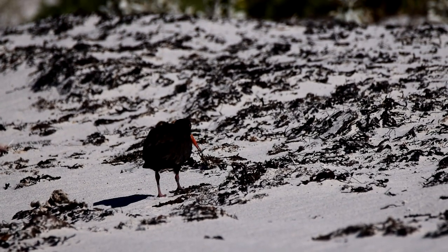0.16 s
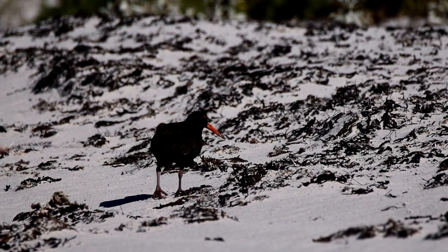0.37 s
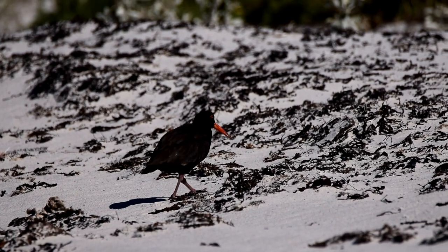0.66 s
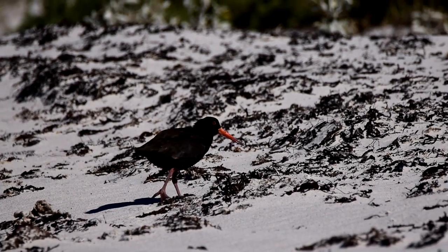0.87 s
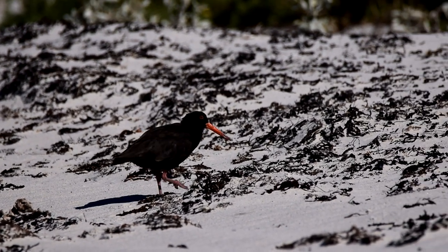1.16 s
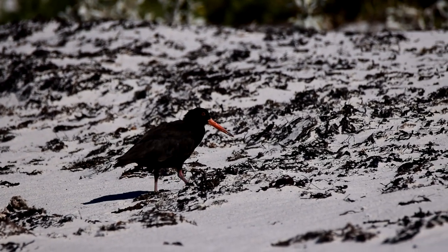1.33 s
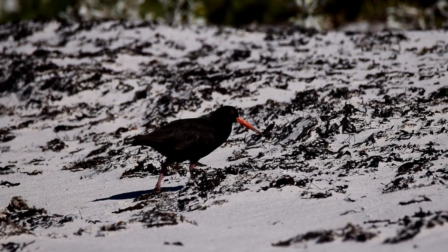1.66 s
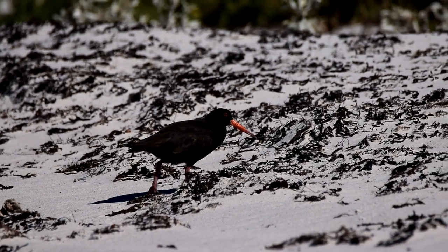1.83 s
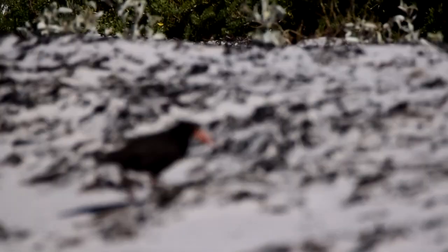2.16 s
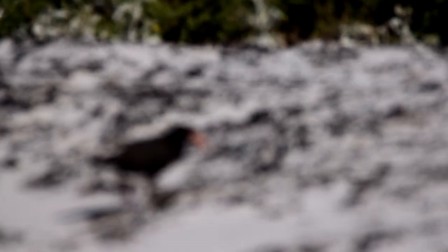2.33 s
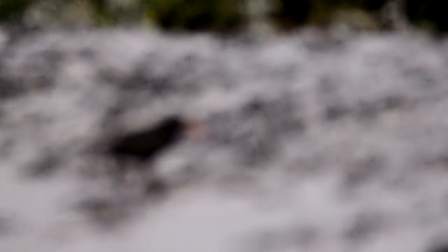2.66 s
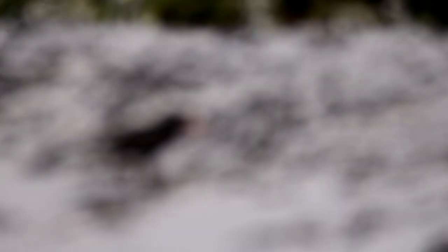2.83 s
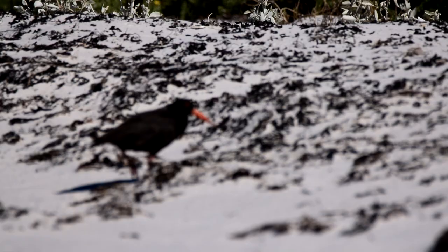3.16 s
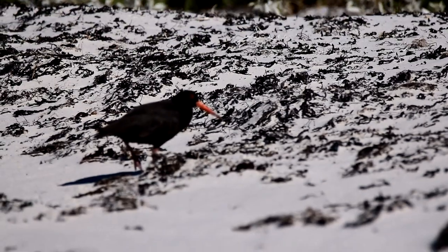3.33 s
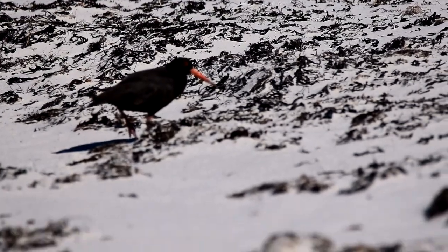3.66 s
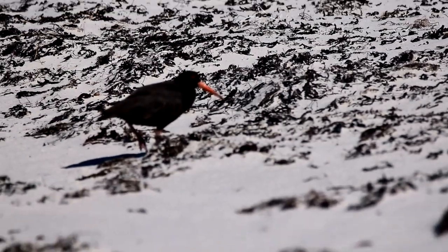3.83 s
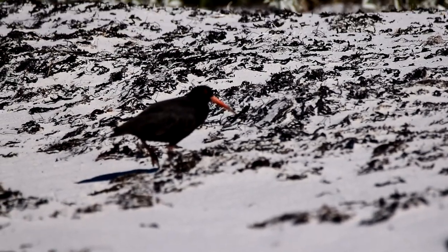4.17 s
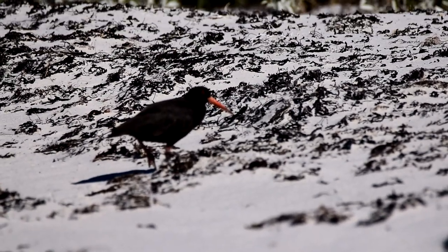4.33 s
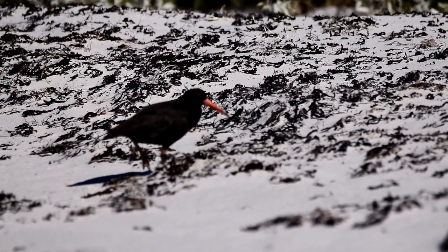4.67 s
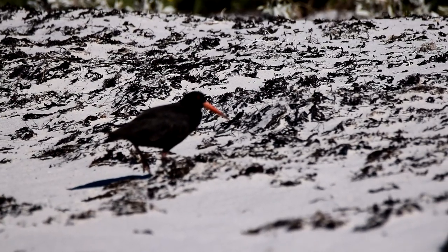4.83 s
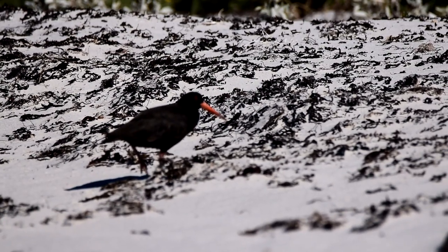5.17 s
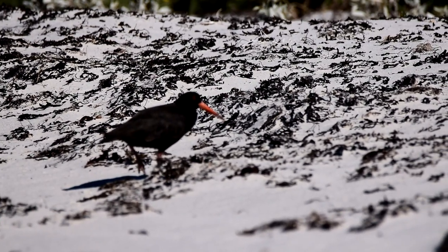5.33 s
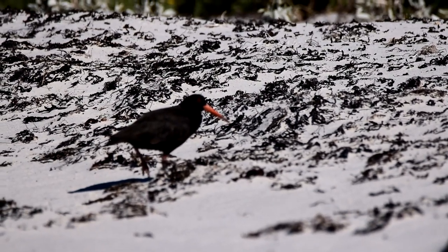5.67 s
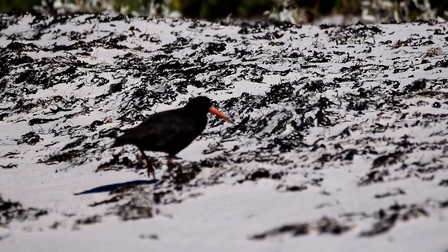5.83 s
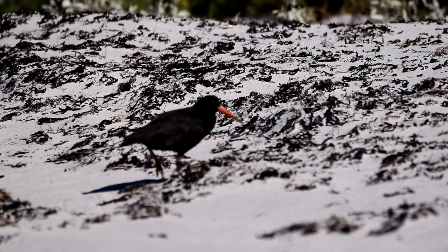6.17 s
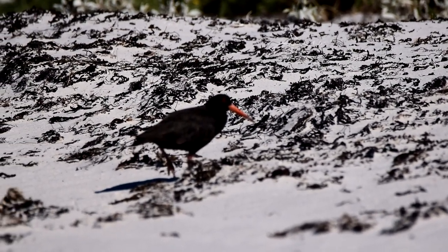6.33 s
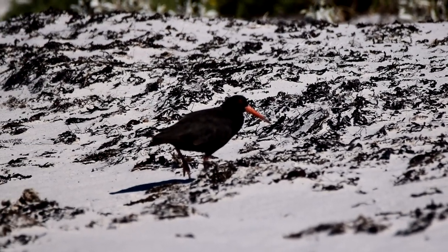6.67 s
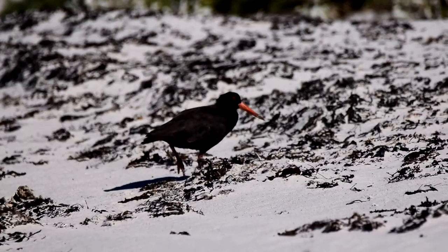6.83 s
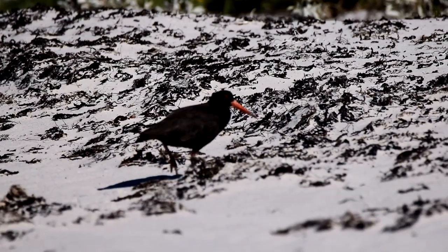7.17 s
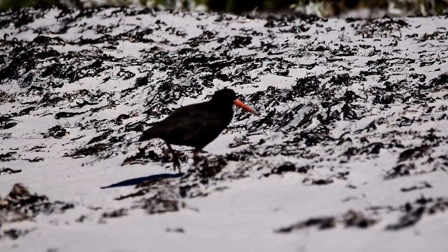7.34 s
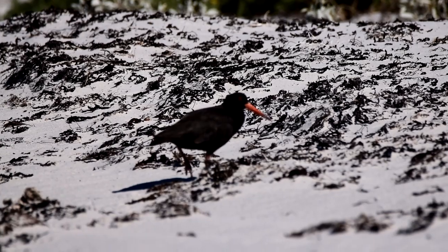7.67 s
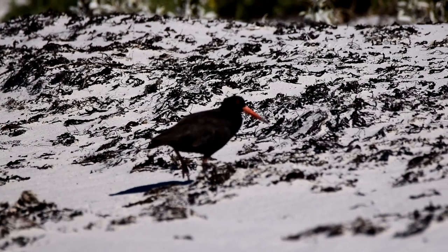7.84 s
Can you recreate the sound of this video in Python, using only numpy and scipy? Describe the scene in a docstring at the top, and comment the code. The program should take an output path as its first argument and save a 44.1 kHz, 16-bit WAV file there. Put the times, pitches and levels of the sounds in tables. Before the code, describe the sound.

Loud, clear bird whistles, each arching up and down with slight rasp, break through constant quiet surf and faint camera focusing whispers.

```python
"""An oystercatcher pipes six notes on an open beach, one of them very soft and on the low side alone.
The other five start and end on the low side of the syrinx and arch over on the high side in the middle;
where both sides sound they beat and rasp. Surf, hissing noise in bands, swells as waves spill and fizz.
A camera's focus drive whispers in narrow hisses and its lens pings once; two dry ticks are bursts of noise.
A breeze adds a very faint low rumble, and a faint low thump follows the loudness of the sound."""
import sys
import numpy as np
from scipy import signal
from scipy.fft import rfft, irfft
from scipy.io import wavfile

SR = 44100
rng = np.random.default_rng(int(sys.argv[2]) if len(sys.argv) > 2 else 0)


def persist_wave(psi):
    """Save psi, clipped to +-1, as 16-bit WAV."""
    counts = np.round(np.clip(psi, -1, 1) * 32767).astype(np.int16)
    wavfile.write(sys.argv[1], SR, np.atleast_2d(counts).T)


N = 352800

# notes, as the low side of the syrinx sings them:
# (start [s], end of the rise [s], start of the fall [s], end [s])
NOTE_TIMES = [(0.073, 0.153, 0.206, 0.329), (1.952, 1.986, 2.124, 2.219), (3.353, 3.397, 3.528, 3.617),
              (4.939, 4.995, 5.014, 5.043), (6.75, 6.767, 6.917, 6.959), (7.139, 7.152, 7.269, 7.328)]
# the low side in each note: (top pitch [Hz], bend of the fall [1 straight, less = late plunge],
# octave [dB], third harmonic [dB], fall of the higher ones [dB per harmonic])
LOW_SIDE_VOICES = [ (2334, 0.44, -31.5, -38, -9), (2330, 0.46, -26, -30.5, -7.5),
                   (2348, 0.48, -30.5, -34, -12.5), (2215, 0.52, -56, -78, -15),
                   (2366, 1.1, -30.5, -35.5, -15), (2285, 0.3, -44, -48.5, -14), ]
# arches of the high side, which takes over between a note's rise and its fall:
# (crest time [s], crest pitch [Hz], pitch where it breaks back [Hz], waver [share of the pitch], tremble [dB],
# lead over the low side [dB], octave [dB], third harmonic [dB], fall of the higher ones [dB per harmonic])
HIGH_SIDE_ARCHES = [ (0.173, 2663, 2474, 0.0027, -1.2, 16, -37.5, -43, -10),
                    (2.038, 2654, 2364, 0.00031, 0.2, 28, -23.5, -33, -7),
                    (3.44, 2652, 2463, 0.00023, 0.6, 39, -34.5, -33.5, -18),
                    (6.835, 2570, 2510, 0.0071, 1.5, 30, -35.5, -44.5, -16),
                    (7.192, 2653, 2405, 0.0068, 2, 24, -46, -49, -17), ]
# loudness of each note, one list a note: (time [s], level [dB])
NOTE_LOUDNESS = [
    [(0.072, -38), (0.082, -26.5), (0.132, -12.5), (0.15, -13.5), (0.242, -12.5), (0.292, -24),
     (0.312, -23), (0.33, -37)],
    [(1.95, -26), (1.956, -27), (1.994, -12), (2.004, -17), (2.068, -19.5), (2.086, -10.5), (2.116, -16.5),
     (2.2, -21.5), (2.221, -33)],
    [(3.351, -36), (3.357, -28), (3.377, -15), (3.441, -12), (3.487, -17.5), (3.509, -10), (3.573, -15),
     (3.62, -34.5)],
    [(4.938, -40), (4.962, -31.5), (5.03, -33), (5.045, -41)],
    [(6.753, -32), (6.763, -22.5), (6.825, -17), (6.837, -28), (6.857, -30), (6.879, -14.5), (6.917, -12),
     (6.953, -28.5), (6.963, -40)],
    [(7.14, -32), (7.146, -22.5), (7.238, -27), (7.27, -20), (7.3, -23.5), (7.328, -33)],
]


def oystercatcher(fade_s=0.003):
    """Six piped notes; one without an arch stays on the low side of the syrinx alone."""
    out = np.zeros(N)
    for times, low, loudness in zip(NOTE_TIMES, LOW_SIDE_VOICES, NOTE_LOUDNESS):
        start, end = times[0], times[-1]
        t = np.arange(start - fade_s, end + fade_s, 1 / SR)
        arch = next((a for a in HIGH_SIDE_ARCHES if start < a[0] < end), None)
        gate = ramp(t, t[0], start) * ramp(t, t[-1], end)
        sides = syrinx(times, low, arch, loudness, t)
        add(out, t[0], gate * note(sides, t))
    return out


ONSET_HZ, END_HZ, RISE_BEND = 1920, 1766, 0.62  # every note scoops up from one pitch and sinks to another
BREAK_UP_S, BREAK_BACK_S = 0.0071, 0.016  # how fast the sides hand over
OVERTONE_ATTACK_S, OVERTONE_RELEASE_S = 0.021, 0.031
OVERTONE_EDGE_DB = -11.5  # overtones are weaker at a note's ends
EDGE_FALL_DB = -3.5  # and the highest go first, per harmonic
WAVER_PER_S, TREMBLE_PER_S = 26, 77  # pace of the high side's unsteadiness in pitch and in level


def syrinx(times, low, arch, loudness, t):
    """Each side through one note: (pitch [Hz], level [dB], octave and third re note [dB], fall [dB/harmonic])."""
    start, risen, falls, end = times
    top_hz, bend, *low_timbre = low
    db, = curves(loudness, t)
    breath = ramp(t, start, start + OVERTONE_ATTACK_S) * ramp(t, end, end - OVERTONE_RELEASE_S)
    slack = 1 - breath

    def timbre(octave_db, third_db, fall_db):
        """Overtones hold their level through the note and dull where the breath is slack."""
        dull_db = OVERTONE_EDGE_DB * slack - db
        return octave_db + dull_db, third_db + dull_db, fall_db + EDGE_FALL_DB * slack

    rise = ramp(t, start, risen) ** RISE_BEND
    fall = ramp(t, end, falls) ** bend
    low_hz = top_hz + (ONSET_HZ - top_hz) * (1 - rise) + (END_HZ - top_hz) * (1 - fall)
    if arch is None:
        return [(low_hz, db, *timbre(*low_timbre))]

    crest, crest_hz, exit_hz, waver, tremble_db, lead_db, *high_timbre = arch
    arch_hz = crest_hz + (exit_hz - crest_hz) * ((t - crest) / (falls - crest)) ** 2
    high_hz = np.maximum(arch_hz, top_hz) * (1 + waver * walk(WAVER_PER_S, len(t)))
    # the high side seizes the air at the top of the rise and gives it back at the fall
    inside = np.minimum((t - risen) / BREAK_UP_S, (falls - t) / BREAK_BACK_S)
    inside = np.maximum(inside, -2)
    ahead_db = lead_db * (1 - np.exp(-inside))
    # both sides together keep the power of the loudness curve, before the tremble
    low_db = db - 10 * np.log10(1 + undb(ahead_db) ** 2)
    high_db = low_db + ahead_db + tremble_db * walk(TREMBLE_PER_S, len(t))
    return [(low_hz, low_db, *timbre(*low_timbre)), (high_hz, high_db, *timbre(*high_timbre))]


NOTCH_HZ, NOTCH_WIDTH_HZ, NOTCH_DB = 4964, 172, -14  # a notch of the windpipe that the octave sweeps through
# colour that windpipe and bill give the overtones above the octave: (frequency [Hz], gain [dB])
THROAT_COLOUR = [(6000, -5.5), (7000, -8.5), (8000, -10), (9200, 1), (10500, 0), (11500, 4.5), (12400, -6),
                 (13200, 1.5), (14000, -2.5), (15500, 0)]


def note(sides, t, drive=1.0, coupling=0.89, overtone_flutter_db=2.0, rasp_db=-31, air_db=-45, break_air_db=-35):
    """The sides share one airstream: they beat, saturate together and make one series of overtones."""
    swings = np.array([membrane(hz, db) for hz, db, *_ in sides])
    # a side that falls well behind the other is starved of air and stops
    strength = abs(swings) / (abs(swings).max(0) + 1e-9)
    swings = swings * np.minimum(strength / .33, 1) ** 2
    power = abs(swings) ** 2 + 1e-14
    effort = np.sqrt(power.sum(0))
    share = power / power.sum(0)

    # the high side mirrors the low one to a combination tone above itself
    mirrored = sum(high ** 2 * swings[0].conj() for high in swings[1:]) / effort ** 2
    flow = swings.sum(0) + 1j * coupling * mirrored
    saturated = np.tanh(drive * abs(flow) / effort) / np.tanh(drive)
    tone = saturated * np.sin(np.angle(flow))

    # the stronger side closes the valve, so it sets the phase and timbre of the overtones
    hz, _, octave_db, third_db, fall_db = sum(part * np.array(side) for part, side in zip(share, sides))
    valve = (np.sqrt(share) * swings).sum(0) / effort
    octave_gain = undb(octave_db + NOTCH_DB * bell(2 * hz, NOTCH_HZ, NOTCH_WIDTH_HZ))
    overtones = octave_gain * np.sin(2 * np.angle(valve))
    for step, k in enumerate(range(3, 9)):
        harmonic_db = third_db + fall_db * step + overtone_flutter_db * walk(88, len(t))
        gain = undb(harmonic_db) * colour(THROAT_COLOUR, k * hz)
        overtones = overtones + gain * np.sin(k * np.angle(valve))

    # turbulence roughens the tone and leaves a thin hiss, most where both sides are equally strong
    clash = 2 * (1 - (share ** 2).sum(0))
    rasp = undb(rasp_db) * walk(1200, len(t))
    hiss = noise(lambda f: bell(f, 5700, 3200), len(t))
    air = (undb(air_db) + undb(break_air_db) * clash) * hiss
    return effort * ((tone + abs(valve) * overtones) * (1 + rasp) + air)


def membrane(hz, db, flutter_db=1.37, jitter=.0025):
    """One side of the syrinx as a rotating phasor with a slightly unsteady pitch and level."""
    unsteady_hz = hz * (1 + jitter * walk(170, len(hz)))
    phase = 2 * np.pi * np.cumsum(unsteady_hz) / SR + rng.uniform(0, 2 * np.pi)
    swing = np.sqrt(2) * undb(db + flutter_db * walk(91, len(hz)))
    return swing * np.exp(1j * phase)


def beach(x, scatter_db=-29, t60_s=.2):
    """Sand, weed and scrub scatter a weak, short tail: decaying noise convolved with the call."""
    t = np.arange(SR // 2) / SR
    tail = noise(lambda hz: bell(hz, 2000, 2500), len(t)) * np.exp(-np.log(1000) * t / t60_s)
    return x + undb(scatter_db) * signal.fftconvolve(x, tail / np.linalg.norm(tail))[:N]


SURF_DB = -37.5  # rms level of the whole surf
# swell of the surf, of which only the swing about each column's mean is heard:
# (time [s], roar of the breakers [dB], wash [dB], foam fizz [dB])
WAVE_SWELLS = [(0.0, -55.5, -33, -55), (0.4, -56, -37, -55.5), (0.7, -58.0, -41.5, -55.0),
               (1.0, -58, -39.5, -57.5), (1.3, -56.0, -41, -58), (1.85, -56.0, -37.5, -55.5),
               (2.3, -61.5, -38.5, -57.5), (2.8, -62, -41, -59), (3.3, -62.5, -38.5, -55),
               (3.75, -60, -40.0, -55), (4.1, -61.5, -40, -56.5), (4.8, -60.5, -43.5, -59.0),
               (5.7, -62, -43, -58.5), (6.35, -60, -42.5, -57), (6.65, -58, -40, -57),
               (7.05, -58, -40, -56.0), (7.5, -57, -40.5, -57.5), (8.0, -57.5, -38, -56.5)]
# relative spectrum of the surf: (frequency [Hz], density [dB per Hz])
SURF_SPECTRUM = [(120, -39), (200, -29), (227, -29), (315, -15.5), (715, -16), (1170, -4), (1740, 1.5),
                 (1950, 0), (2130, 0.5), (3120, -2.5), (4660, -17), (10600, -37), (15500, -36)]


def surf(flicker_db=1.6, churn_db=0.39, spray_follow=0.26):
    """Half-octave bands follow roar, wash and fizz; each flickers a little as the water churns."""
    roar, wash, fizz = (c - np.mean(c) for c in curves(WAVE_SWELLS, np.arange(N) / SR))
    swells = np.array([roar, wash, fizz, spray_follow * fizz])
    swell_hz = [650, 1700, 5000, 12000]
    hz = np.fft.rfftfreq(N, 1 / SR)
    water = rfft(rng.standard_normal(N)) * colour(SURF_SPECTRUM, hz)
    band_of = np.floor(2 * np.log2(np.maximum(hz, 200) / 200))
    churn = churn_db * walk(9, N)  # common to all bands
    out = 0
    for band in range(13):
        inside = band_of == band
        band_hz = hz[inside].mean()
        # each band blends the two swells nearest to it in pitch
        shares = [np.interp(np.log(band_hz), np.log(swell_hz), row) for row in np.eye(len(swells))]
        motion_db = shares @ swells + churn + flicker_db * walk(10.2, N)
        out = out + irfft(water * inside, N) * undb(motion_db)
    return level(out, SURF_DB)


# moves of the camera's focus drive: (start [s], length [s], centre [Hz], width [Hz], level [dB])
FOCUS_DRIVE_MOVES = [(2.098, 0.527, 3152, 574, -39.5), (2.601, 0.36, 3400, 350, -46.5),
                     (3.078, 0.51, 3330, 554, -45), (4.721, 1.3, 2950, 300, -46)]


def focus_drive(waver_db=2.0, ramp_s=0.037):
    """The focus drive rubs softly: a narrow hiss for each move."""
    out = np.zeros(N)
    for start, length, centre_hz, width_hz, db in FOCUS_DRIVE_MOVES:
        t = np.arange(0, length, 1 / SR)
        fade = np.minimum(np.minimum(t, length - t) / ramp_s, 1)
        run = fade * undb(db + waver_db * walk(11, len(t)))
        add(out, start, run * noise(lambda hz: bell(hz, centre_hz, width_hz), len(t)))
    return out


# a tiny metallic ping as the lens refocuses: (time [s], level [dB])
LENS_PING = (3.063, -39)
# its modes: (frequency [Hz], level re the ping [dB], t60 [s])
LENS_PING_MODES = [(9400, 0, 0.04), (12000, -10, 0.04)]


def lens_ping(attack_s=.001):
    """Decaying sine modes, as of small metal, with a softened onset."""
    out, t = np.zeros(N), np.arange(SR // 10) / SR
    ring = 0
    for hz, db, t60 in LENS_PING_MODES:
        ring = ring + undb(db) * np.sin(2 * np.pi * hz * t) * np.exp(-np.log(1000) * t / t60)
    s, db = LENS_PING
    add(out, s, undb(db) * ring * (1 - np.exp(-t / attack_s)))
    return out


# faint dry ticks around the second note: (time [s], peak level [dB])
DRY_TICKS = [(1.94, -25), (2.2215, -41)]


def ticks(decay_s=0.00022):
    """Dry ticks: bright noise that dies away within a few milliseconds."""
    out, t = np.zeros(N), np.arange(SR // 10) / SR
    for s, db in DRY_TICKS:
        tick = noise(lambda hz: bell(hz, 5800, 6000), len(t)) * np.exp(-t / decay_s)
        add(out, s, undb(db) * tick / abs(tick).max())
    return out


def breeze(rumble_db=-80):
    """A very faint low rumble of moving air."""
    return undb(rumble_db + 2 * walk(2.0, N)) * noise(lambda hz: bell(hz, 50, 110), N)


def undb(db):
    """Decibels to gain."""
    return 10 ** (np.asarray(db) / 20)


def level(x, db):
    """Scale to an rms level."""
    return x * undb(db) / np.sqrt(np.mean(x ** 2))


def curves(rows, t):
    """Each column of a table, joined by straight lines at times t."""
    s, *columns = np.transpose(rows)
    return [np.interp(t, s, c) for c in columns]


def ramp(t, zero_s, one_s):
    """A straight line from 0 at one time to 1 at another, held beyond them."""
    return np.clip((t - zero_s) / (one_s - zero_s), 0, 1)


def colour(points, hz):
    """Gain of a (frequency [Hz], level [dB]) spectrum at the given frequencies."""
    f, db = np.transpose(points)
    return undb(np.interp(np.log(np.maximum(hz, 1)), np.log(f), db))


def bell(hz, centre_hz, width_hz):
    """A smooth hump in frequency."""
    return np.exp(-.5 * ((hz - centre_hz) / width_hz) ** 2)


def noise(shape, size):
    """Noise of unit rms whose spectrum is the function shape(Hz)."""
    hz = np.fft.rfftfreq(size, 1 / SR)
    return level(irfft(rfft(rng.standard_normal(size)) * shape(hz), size), 0)


def walk(rate, size):
    """Smooth chance with unit rms, changing about rate times a second."""
    return noise(lambda hz: bell(hz, 0, rate), size)


def add(out, s, sound):
    """Mix a sound in at time s."""
    i = int(s * SR)
    out[i:i + len(sound)] += sound[:len(out) - i]


def scene():
    """Bird, surf, the camera's own small sounds, ticks and breeze, heard from one spot."""
    bird = beach(oystercatcher())
    camera = focus_drive() + lens_ping()
    return (bird + surf() + camera + ticks() + breeze())[None]


def record(dry, thump=0.06, thump_hz=45, top_hz=15750):
    """A very faint low thump follows the loudness of the sound; lowest bass and top are cut."""
    loudness = signal.sosfilt(signal.butter(2, thump_hz, fs=SR, output="sos"), dry ** 2)
    thumping = dry + thump * loudness
    bass_cut = signal.sosfilt(signal.butter(2, 20, "high", fs=SR, output="sos"), thumping)
    return signal.sosfilt(signal.ellip(10, .1, 80, top_hz, fs=SR, output="sos"), bass_cut)


dry = scene()
out = record(dry)
persist_wave(out)
```